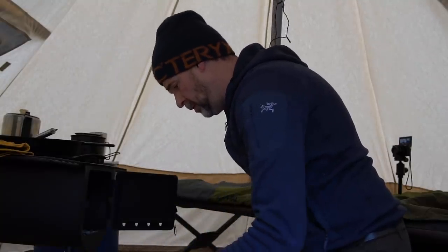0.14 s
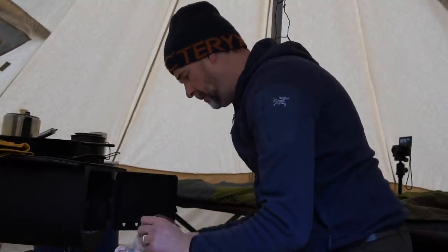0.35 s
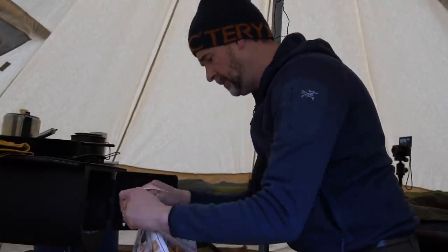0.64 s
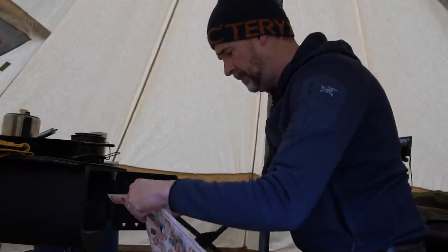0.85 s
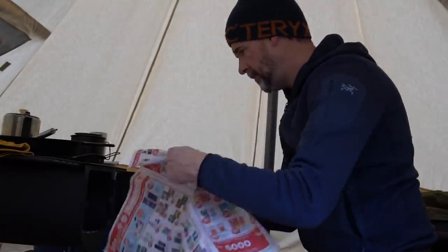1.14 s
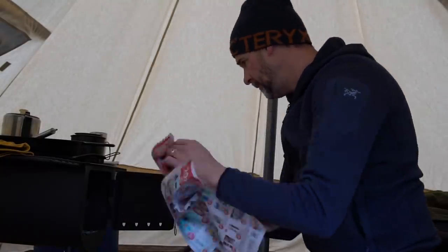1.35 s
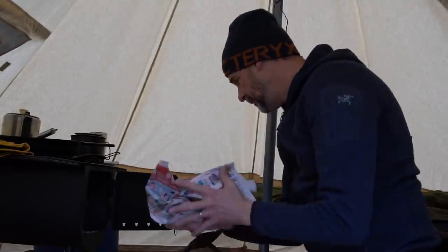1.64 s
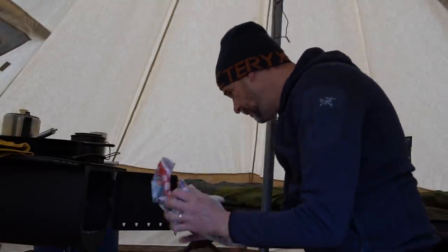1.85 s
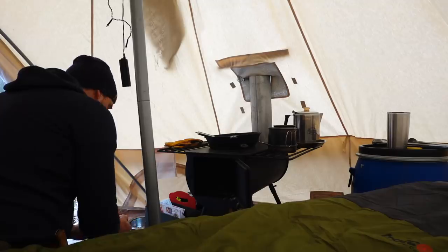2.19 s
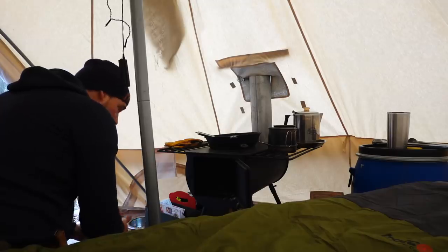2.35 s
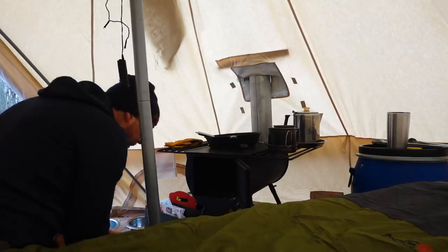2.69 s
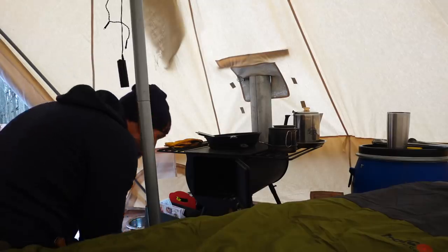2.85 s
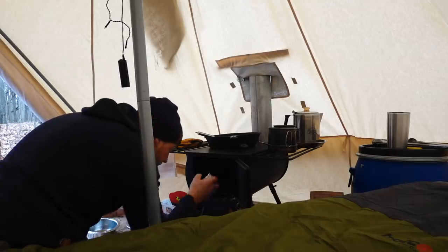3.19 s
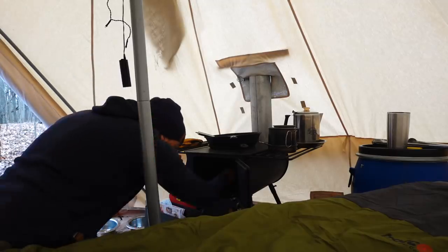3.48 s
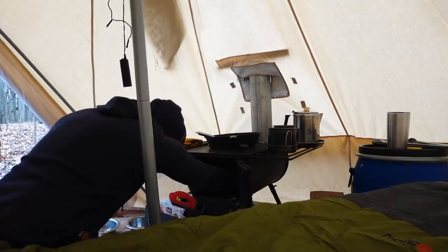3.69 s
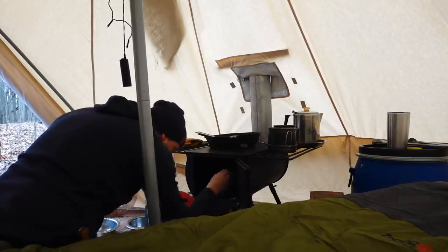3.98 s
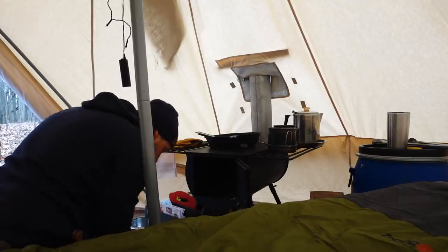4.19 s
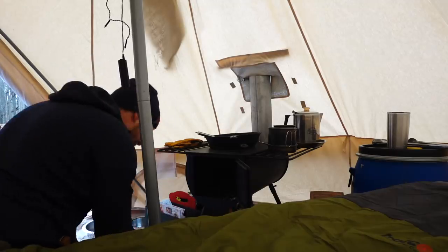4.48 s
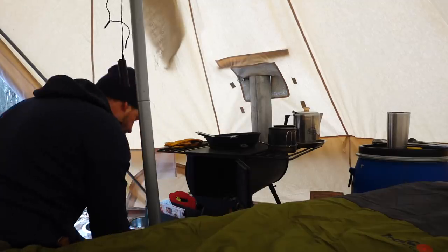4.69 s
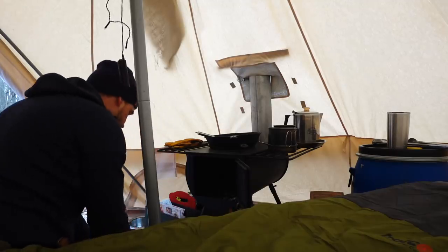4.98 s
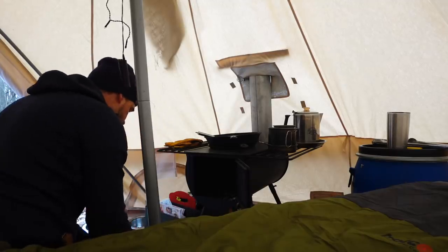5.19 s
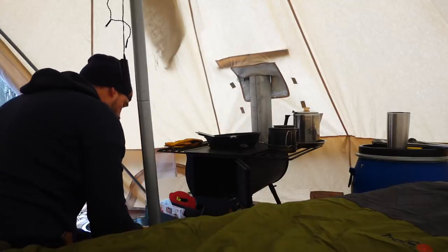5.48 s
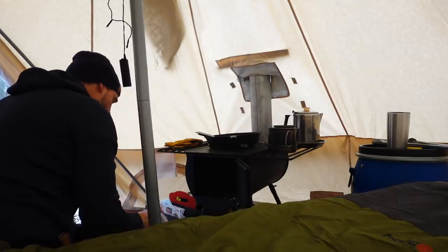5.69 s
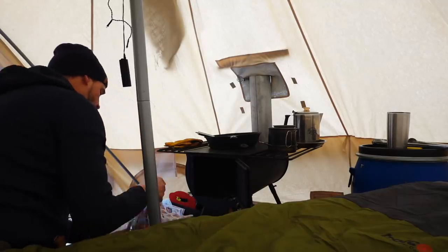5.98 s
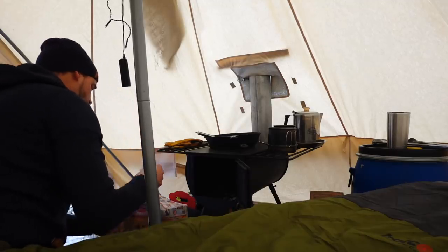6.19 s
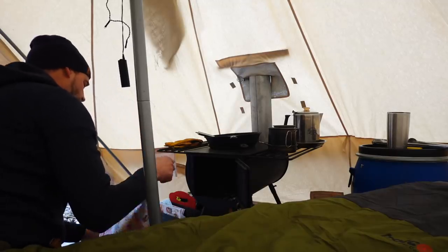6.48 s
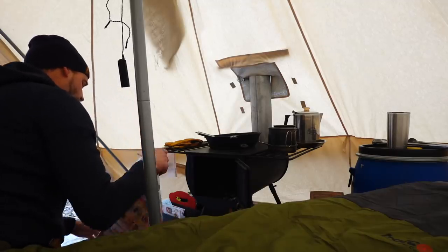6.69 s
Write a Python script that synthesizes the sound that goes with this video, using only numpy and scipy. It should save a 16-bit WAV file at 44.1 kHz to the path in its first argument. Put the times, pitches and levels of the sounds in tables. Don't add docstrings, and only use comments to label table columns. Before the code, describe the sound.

Hands ball up a sheet of paper, loud and close for three seconds, then fainter crinkles and small knocks continue inside a canvas tent.

```python
import sys
import numpy as np
from scipy import signal
from scipy.io import wavfile
from scipy.ndimage import uniform_filter1d

SR = 44100
rng = np.random.default_rng(int(sys.argv[2]) if len(sys.argv) > 2 else 0)


def pcm_store(signal):
    levels = np.round(np.clip(np.atleast_2d(signal), -1, 1) * 32767)
    wavfile.write(sys.argv[1], SR, levels.astype(np.int16).T)


def makeup_ratio(level_db):
    decades = np.asarray(level_db, float) / 20
    return 10 ** decades


N = 302085

# [low_hz, high_hz]
CREASE_SIZES = [(150, 600), (600, 2000), (2000, 5000), (5000, 18000)]
CREASES_PER_S = [300, 900, 2500, 3000]
SHARED_PART = [0.75, 1, 0.85, 0.79]
POP_DRIVE = [-5.5, -3.5, 8]


def paper():
    shared = clicks(per_s=900, spread_db=0.3)
    bursts = clumps(rate_hz=66, depth_db=-0.2)
    slips = stick_slip(hold_db=1.0, hold_s=0.04, slip_db=1.5, slip_s=0.033)
    move_columns = [3, 3, 0, 4]
    pop_columns = [None, 2, 0, 3]
    out = np.zeros(N)
    for k, ((lo_hz, hi_hz), per_s) in enumerate(zip(CREASE_SIZES, CREASES_PER_S)):
        ring = sheet_ring(lo_hz, hi_hz)
        own = 0.7 * grains(lo_hz, hi_hz, per_s, cycles=3.5)
        rub = 0.22 * rng.standard_normal(N)
        crackle = SHARED_PART[k] * shared + own + rub
        crackle = crackle * bursts * clumps(rate_hz=30, depth_db=0.9)
        crackle = canvas(crackle, wet_db=-6.5, t60=0.045)
        crackle = shifting(signal.oaconvolve(crackle, ring)[:N], patchy_db=1.6)
        level = hands(move_columns[k])
        if k == 0:
            level = level * flapping()
        out += level * slips * crackle * makeup_ratio(0.37)
        if k > 0:
            pops = snaps(pop_columns[k], POP_DRIVE[k - 1])
            ring_peak = abs(signal.hilbert(ring)).max()
            out += signal.oaconvolve(pops, ring / ring_peak)[:N]
    return out


# [start_s, hold_s, effort_db, wide_folds_db over effort, crisp_creases_db over effort]
JERKS = [(0.0, 0.047, -25, -4.5, -10.5), (.178, 0.0065, -37, -8.5, -3), (.498, 0.031, -27, -1.5, -5),
         (.571, 0.089, -24.5, -7, -11), (.87, 0.074, -26.5, -7, -5), (1.1215, 0.13, -26.5, -4, -5),
         (2.125, 0.097, -24.5, -7.5, -6.5), (2.389, 0.054, -29, -8.5, -6), (2.758, 0.073, -36, -8, -5.5),
         (2.86, 0.0071, -36, -6, -5), (3.441, .12, -42, -5.5, -5), (3.72, 0.1, -43, -4, -8.5),
         (3.87, 0.13, -47, -1.5, -7.5), (4.203, 0.01, -43, -6, 0), (4.4655, 0.046, -46, -2, -4),
         (4.844, 0.048, -43, -8, -8), (4.914, 0.034, -38, -16, -21), (5.053, 0.046, -52, -23, -7),
         (5.12, 0.11, -53, 2, -8), (5.331, 0.017, -43.5, -12, -5), (6.54, 0.012, -57.5, 10, -18),
         (6.665, .06, -57, -7, -1), (3.57, 0.077, -45, -5, -5.5), (.31, 0.028, -48, 10, -9)]
SQUEEZES = [(.1, 0.035, -36.5, -3.5, -12.5), (.34, 0.019, -36, -1, -7), (.45, 0.03, -28, -1, -9),
            (.7, 0.02, -28.5, -6, -6.5), (.78, 0.045, -26, -6, -15), (.96, 0.11, -33, -2, -7.5),
            (1.22, 0.033, -24, -9, -14), (1.39, 0.092, -25, -4.5, -8.5), (1.59, 0.061, -25, -6.5, -12.5),
            (1.7, 0.027, -24, -5, -6), (1.79, 0.035, -25, -2, -6.5), (1.87, .03, -26, -5.5, -5.5),
            (1.93, 0.053, -27, -2.5, -7), (2.01, 0.062, -28, -3.5, -6), (1.5, 0.081, -28.5, -1.5, -7),
            (1.3, 0.048, -24, -6.5, -9), (2.26, 0.11, -29, -6, -6), (2.49, 0.082, -30, -3, -5),
            (2.62, 0.083, -32.5, -6, -7), (2.92, 0.028, -41, -13, -10), (2.99, 0.0092, -33.5, -10.5, -8),
            (3.15, 0.068, -40.5, -5, -6), (3.27, 0.036, -44.5, -5.5, -7.5), (3.35, 0.096, -46, -6.5, -8),
            (4.96, 0.0097, -44.5, -14, -0.5), (4.61, 0.0067, -43, -4, -4.5), (3.97, 0.11, -43, -5, -9),
            (4.3, 0.048, -58, -20, -30), (4.1, 0.091, -48.5, -7, -7.5), (4.54, 0.061, -43, -3.5, -6),
            (4.78, 0.018, -44, -5, -4), (5.29, 0.03, -49, -6.5, -2.5), (5.52, 0.016, -50, -22, -4),
            (6.77, 0.021, -47.5, 0.5, -7.5)]
# [rise_db_per_s, sag_db_per_s while held, fall_db_per_s]
JERK_SPEED = (7000, 36, 225)
SQUEEZE_SPEED = (226, 19.5, 230)


def hands(column):
    return np.sqrt(moves(JERKS, column, JERK_SPEED) + moves(SQUEEZES, column, SQUEEZE_SPEED))


def moves(rows, column, speed):
    rows = np.array(rows)
    rise, sag, fall = speed
    t = np.arange(0, N, 16) / SR
    since = t - rows[:, :1]
    hold_s = abs(rows[:, 1:2])
    early = np.minimum(since, 0)
    slack_db = -6 + 350 * early
    shape_db = np.maximum(rise * early, slack_db)
    shape_db -= sag * np.clip(since, 0, hold_s)
    shape_db -= fall * np.maximum(since - hold_s, 0)
    peak_db = rows[:, 2] + (rows[:, column] if column else 0)
    power = (makeup_ratio(peak_db[:, None] + shape_db) ** 2).sum(0)
    return np.interp(np.arange(N) / SR, t, power)


# [time_s, flap_db over wide folds]
FLAP = [(0, -8), (.33, -4), (.55, -9), (1.3, -7.5), (2.0, -14), (2.6, -10.5), (2.75, -20), (5, -16),
        (6.85, -18)]


def flapping():
    return makeup_ratio(along(FLAP, 1))


# [time_s, peak_db, fold_db over peak, crisp_db over peak]
SNAPS = [(0.0418, -27, -16, -32), (0.1775, -20, 2, -9), (0.2862, -26, -9, -8), (0.4494, -14, -10, -22),
         (0.4988, -11.5, -8, -3), (0.5701, -19, 3, -29), (0.6489, -8, -19, -13), (0.6998, -18, -12, -10),
         (0.7647, -17, -19, -8), (0.8744, -28, -8, -19), (0.9837, -17, -30, -26), (1.0041, -12, -11, -26),
         (1.1209, -6, -21, -16.5), (1.1433, -15, -14, -18), (1.1832, -9, -4, -26), (1.2426, -20, -12, -27),
         (1.3019, -12, -16, -14), (1.3568, -10, -8, -13), (1.4257, -30, -4, -22), (1.5105, -11, -18, -19),
         (1.5903, -17, -4, -27), (1.6546, -15, -21, -14), (1.7963, -22, -17, -25), (1.932, -20, -20, -20),
         (2.1246, -5, -23, -21), (2.3885, -9, -30, -13), (2.5147, -10, -7, -19), (2.5426, -19, -23, -12)]
CRACKS = [(0.114, -34, 0, -19), (0.251, -22.5, -3, -28), (0.429, -27, -9, -20), (0.883, -14, -5, -22),
          (0.9381, -18, -22, -2), (1.0322, -13, -7, -23), (1.5217, -5, -17, -27), (1.8372, -28, -10, -9),
          (2.4703, -25, 2, -11), (2.6219, -18, 2, -15), (2.9916, -13, -12, -14), (3.6064, -27, 3, -16),
          (3.7961, -20, -10, -20), (4.8583, -22, -14, -15)]
TICKS = [(2.6917, -28, -19, -22), (2.7586, -26, -33, -6), (2.8643, -18, -11, -17), (2.955, -47, -19, -35),
         (2.9805, -24, -19, -26), (3.1507, -27, -14, -18), (3.3527, -25, -21, -33), (3.441, -20, -22, -18),
         (3.4628, -21, -10, -17), (3.654, -23, -20, -32), (3.7384, -29, -13, -13),
         (3.7864, -24.5, -18, -22), (3.9097, -26, -8, -27), (3.9408, -22, -19, -20),
         (3.9975, -25, -16, -27), (4.017, -21, -14, -13.5), (4.1278, -23, -19, -32), (4.2039, -25, 1, -12),
         (4.3288, -27.5, -22, -18), (4.4657, -25, -10, -20), (4.8438, -26, -2, -24),
         (4.9139, -20, -18, -24), (4.952, -17.5, -17, -7), (5.053, -30, -21, -9), (5.0788, -25, -11, -13),
         (5.1197, -37, -5, -23), (5.2789, -38, -16, -16), (5.331, -24.5, -28, -6)]
FLECKS = [(0.3132, -30, -4, -16), (0.412, -27, -8, -14), (0.5394, -12, -9, -10), (0.6114, -10, 5, -8),
          (0.8024, -13, -14, -26), (0.861, -17, -14, -17), (0.897, -6, -17, -11), (1.2274, -13, -15, -20),
          (1.6674, -15, -9, -10), (1.7114, -12, -1, -21), (1.7174, -18, -17, -13), (1.8674, -26, -19, -13),
          (1.932, -18, -13, -23), (1.9944, -17, -8, -11), (2.0516, -18, -8, -17), (2.1354, -18, -20, -19),
          (2.214, -19, -16, -18), (2.297, -16, -15, -13), (2.599, -21, -9, -17), (2.6434, -19, -18, -14),
          (3.2235, -34, -4, -29), (3.3263, -29, -11, -16), (3.3373, -29, -16, -23), (3.4924, -35, -14, -22),
          (3.5732, -36, 0, -21), (3.7189, -44, -11, -15), (3.7658, -29, -12, -23), (3.8686, -40, -12, 2),
          (3.9214, -36, -10, -22), (3.9744, -40, -13, -18), (3.9834, -34, -11, -22),
          (4.0574, -39, -13, -19), (4.2766, -37, -13, -23), (4.7667, -40, -10, -16),
          (4.8813, -23, -10, -12), (4.9204, -26, -18, -25), (4.9244, -30, -9, -17),
          (4.9564, -20, -31, -13.5), (4.9654, -24, -19, -1), (4.9744, -36, -18, -12),
          (5.0231, -35, -19, -17), (5.1327, -36, -3, -27), (5.1794, -43, -3, -15), (5.2376, -34, -11, -16),
          (5.2915, -37.5, 0, -9), (6.5404, -47, 11, -22), (6.5435, -42, 7, -27), (6.6388, -39, 6, -19)]
POPS = SNAPS + CRACKS + TICKS + FLECKS


def snaps(column, drive_db):
    t = np.arange(2000) / SR
    out = np.zeros(N + len(t))
    for row in POPS:
        pop = 0.12 * rng.standard_normal(len(t)) * makeup_ratio(-60 * t / 0.018)
        pop[0] = 1
        peak_db = row[1] + (row[column] if column else 0)
        at = round((row[0] + 0.00065) * SR)
        out[at:at + len(t)] += pop * makeup_ratio(peak_db + drive_db)
    return out[:N]


def stick_slip(hold_db, hold_s, slip_db, slip_s):
    starts = [round(row[0] * SR) for row in POPS]
    pops = np.bincount(starts, minlength=N)[:N].astype(float)
    after = signal.lfilter([1], [1, -np.exp(-1 / (slip_s * SR))], pops)
    before = signal.lfilter([0, 1], [1, -np.exp(-1 / (hold_s * SR))], pops[::-1])[::-1]
    return makeup_ratio(slip_db * np.minimum(after, 1) - hold_db * np.minimum(before, 1))


# [pitch_hz, level_db per Hz]
PAPER_COLOUR = [(88, -45), (150, -16), (254, -12), (361, -14), (475, -11.5), (837, -4.5), (1040, -1),
                (2020, -3), (3490, 0), (4760, -9.5), (10400, -21), (12900, -23), (15600, -23.5),
                (16000, -24)]
# [pitch_hz, width_hz, boost_db]
MIC_PORT = (3600, 550, 3.5)


def sheet_ring(lo_hz, hi_hz):
    hz = np.fft.rfftfreq(8192, 1 / SR)
    port_hz, width_hz, boost_db = MIC_PORT
    port_db = boost_db / (1 + (2 * (hz - port_hz) / width_hz) ** 2)
    skirts = 1 / np.sqrt((1 + (lo_hz / (hz + 1)) ** 8) * (1 + (hz / hi_hz) ** 8))
    return causal(makeup_ratio(read(PAPER_COLOUR, hz) + port_db) * skirts)


def grains(lo_hz, hi_hz, per_s, cycles, count=6):
    out = np.zeros(N)
    for hz in np.geomspace(lo_hz, hi_hz, count):
        pole = np.exp((2j * np.pi - 1 / cycles) * hz / SR)
        hits = clicks(per_s / count, spread_db=1.66)
        ring = signal.lfilter([1], [1, -2 * pole.real, abs(pole) ** 2], hits)
        out += np.sqrt(hz) * evened(ring)
    return evened(out) * np.sqrt(2 * (hi_hz - lo_hz) / SR)


def clicks(per_s, spread_db):
    when, size, sign = rng.random((3, int(per_s * N / SR) + 1))
    size_db = spread_db * np.minimum(-np.log(size + 1e-9), 4.5)
    return evened(np.bincount((when * N).astype(int), np.sign(sign - 0.5) * makeup_ratio(size_db), N))


def clumps(rate_hz, depth_db):
    kicks = clicks(rate_hz, spread_db=2.5) ** 2
    r = np.exp(-rate_hz / SR)
    floor = 0.8 * np.mean(kicks) / (1 - r)
    swell = np.log(signal.lfilter([1], [1, -r], kicks) + floor)
    return makeup_ratio(depth_db * evened(swell - swell.mean()))


def canvas(x, wet_db, t60):
    r = makeup_ratio(-120 / (t60 * SR))
    power = abs(signal.lfilter([1 - r], [1, -r], x ** 2))
    return x + makeup_ratio(wet_db) * np.sqrt(power) * rng.standard_normal(N)


def shifting(x, patchy_db):
    z = signal.stft(x, nperseg=512)[2]
    z = z * makeup_ratio(patchy_db * patches(z.shape, bins=3, frames=5))
    return evened(signal.istft(z, nperseg=512)[1][:N])


# [time_s, peak_db]
HAIRLINES = [(0.178, -39), (0.4978, -27), (0.597, -29), (0.611, -23), (0.6724, -17), (0.8974, -27),
             (1.144, -8), (1.3518, -23), (1.671, -11), (1.724, -7), (1.8153, -23), (2.124, -9), (2.65, -11),
             (4.858, -17), (4.941, -19), (5.0529, -27)]


def hairlines():
    t = np.arange(1000) / SR
    out = np.zeros(N + len(t))
    treble = signal.butter(4, 7100, "high", fs=SR, output="sos")
    for s, peak_db in HAIRLINES:
        burst = 0.3 * rng.standard_normal(len(t)) * makeup_ratio(-60 * t / 0.019)
        burst[0] = 1
        tick = signal.sosfilt(treble, burst)
        out[round(s * SR):][:len(t)] += makeup_ratio(peak_db - 8.5) * tick / abs(tick).max()
    return out[:N]


# [time_s, peak_db, pitch_hz]
KNOCKS = [(0.113, -26, 1320), (0.175, -32, 1310), (0.34, -25, 745), (0.414, -32, 1140), (0.498, -25, 1070),
          (0.571, -16, 1450), (0.595, -13, 1350), (0.613, -21, 1110), (0.938, -21, 1090), (1.121, -33, 960),
          (1.301, -20.5, 784), (1.401, -20, 1120), (1.5, -20.5, 1250), (1.662, -37, 1090),
          (1.706, -21, 1660), (1.866, -25, 1180), (1.912, -20, 1200), (1.935, -23, 1020),
          (1.973, -20.5, 1040), (2.481, -22.5, 1480)]
NUDGES = [(2.689, -42, 1380), (2.759, -38, 1500), (2.865, -30, 1170), (2.981, -29, 1170), (2.996, -29, 960),
          (3.131, -39, 1150), (3.163, -30, 1080), (3.226, -29, 1220), (3.493, -41, 1190),
          (3.869, -33, 1660), (3.921, -29, 1290), (4.019, -29, 1600), (4.059, -31, 1560),
          (4.464, -38, 1530), (4.509, -31, 1440), (4.848, -41, 1400), (4.87, -39, 1410), (4.882, -29, 1600),
          (4.912, -31, 1560), (4.952, -26.5, 1620), (5.121, -32, 816), (5.134, -29, 1040),
          (5.15, -36, 1100), (5.163, -36, 1010), (5.21, -39, 1200), (5.18, -35, 1010), (5.198, -36, 1480),
          (5.333, -35, 1140), (6.54, -32, 795), (6.546, -30, 920), (6.64, -41, 800), (6.65, -43, 754),
          (6.732, -38, 850), (6.759, -33, 850), (6.769, -34, 900), (6.779, -31, 1500), (6.781, -40, 850),
          (6.795, -42, 900)]
THUMPS = [
    (0.13, -35.5, 275),
    (0.235, -38, 260),
    (0.335, -25, 116),
    (0.345, -31.5, 267),
    (1.223, -23, 487),
    (1.299, -25.5, 254),
    (1.754, -25, 530),
    (2.137, -32, 312),
    (4.012, -58, 159),
]


def blows():
    knocks = struck(KNOCKS, cycles=3.1, rattle=0.068)
    nudges = struck(NUDGES, cycles=1.4, rattle=0.06)
    thumps = struck(THUMPS, cycles=2.2, rattle=0.012)
    return knocks + nudges + thumps


def struck(rows, cycles, rattle):
    t = np.arange(2000) / SR
    out = np.zeros(N + 4000)
    for s, peak_db, hz in rows:
        ring = np.sin(2 * np.pi * hz * t) * np.exp(-t * hz / cycles)
        blow = rattle * rng.standard_normal(len(t)) * makeup_ratio(-60 * t / 0.086)
        blow[0] = 1
        sound = signal.oaconvolve(blow, ring)
        out[round(s * SR):][:len(sound)] += makeup_ratio(peak_db) * sound / abs(sound).max()
    return out[:N]


# [pitch_hz, level_db per Hz]
TENT_AIR = [(12, -34), (24, -18), (33, -12), (45, 1), (86, 0), (120, -6.5), (301, -28.5), (527, -26),
            (825, -23.5), (1500, -30), (2400, -37), (2900, -34), (3400, -28), (4500, -43), (13200, -51),
            (16000, -53)]


def tent_air():
    return makeup_ratio(-38.5) * gain_control() * patchy_noise(TENT_AIR, patchy_db=2.0)


# [pitch_hz, level_db per Hz]
HISS = [(20, 15), (60, 10), (230, 4), (900, 1.5), (3600, .4), (14000, -.6)]


def amplifier_hiss():
    return makeup_ratio(-66.6) * gain_control() * patchy_noise(HISS, patchy_db=0.3)


# [time_s, gain_db]
GAIN = [
    (0, 2.2),
    (1.05, -.6),
    (1.3, -5),
    (1.6, -2.5),
    (2.4, -3),
    (2.9, -6),
    (6.85, .3),
]


def gain_control():
    return makeup_ratio(along(GAIN, 1))


def patchy_noise(spectrum, patchy_db):
    hz = np.fft.rfftfreq(2048, 1 / SR)
    shape = (len(hz), N // 512 + 5)
    z = rng.standard_normal(shape) + 1j * rng.standard_normal(shape)
    z = z * makeup_ratio(read(spectrum, hz)[:, None] + patchy_db * patches(shape, bins=5, frames=8))
    return evened(signal.istft(z, nperseg=2048, noverlap=1536)[1][:N])


def patches(shape, bins, frames):
    rough = rng.standard_normal(shape)
    return evened(uniform_filter1d(uniform_filter1d(rough, size=bins, axis=0), size=frames, axis=1))


def evened(x):
    return x / np.sqrt(np.mean(x ** 2) + 1e-20)


def read(points, hz):
    f, value = np.transpose(points)
    return np.interp(np.log(hz + 1), np.log(f + 1), value)


def along(rows, column):
    rows = np.array(rows)
    return np.interp(np.arange(N) / SR, rows[:, 0], rows[:, column])


def causal(gain, size=2048):
    log_gain = np.log(np.maximum(np.r_[gain, gain[-2:0:-1]], 1e-5))
    return np.fft.ifft(np.exp(log_gain - 1j * signal.hilbert(log_gain).imag)).real[:size]


def scene():
    left = 2 * (paper() + hairlines() + blows() + tent_air())
    return np.array([left, np.zeros(N)])


def band_limit(x):
    return signal.sosfilt(signal.butter(12, 16100, fs=SR, output="sos"), x)


def record(dry):
    left = 0.73 * np.tanh(dry[0] / 0.73)
    leak = makeup_ratio(-48) * np.diff(left, prepend=0)
    right = dry[1] + amplifier_hiss() + leak
    top_edge = signal.firwin(401, 15750, window=("kaiser", 8), fs=SR)
    mix = signal.oaconvolve(np.array([left, right]), top_edge[None], "same")
    return band_limit(mix)


dry = scene()
out = record(dry)
pcm_store(out)
```